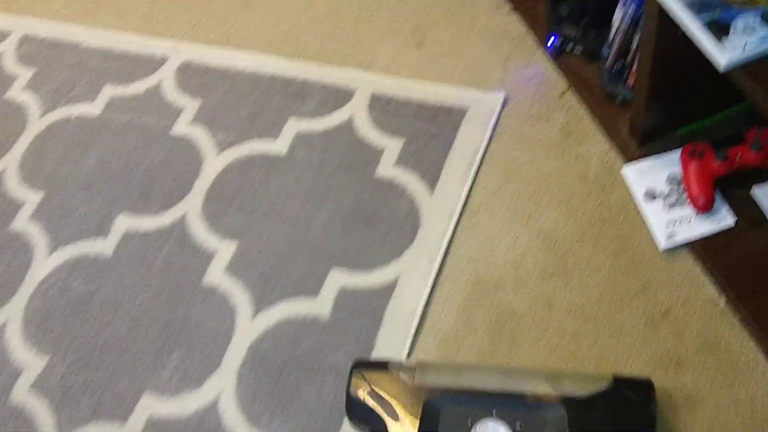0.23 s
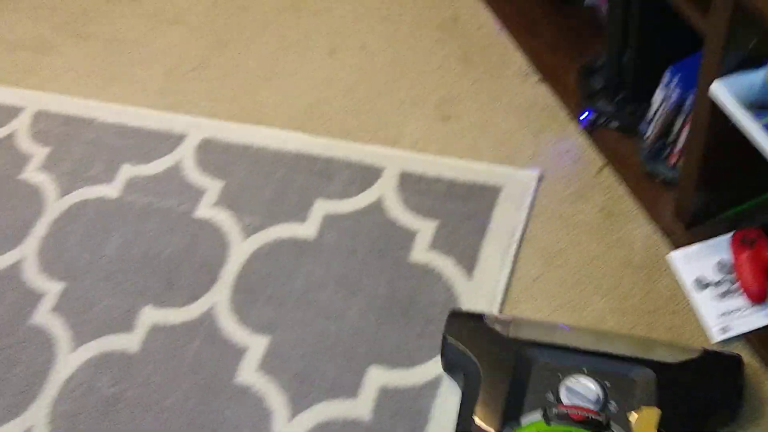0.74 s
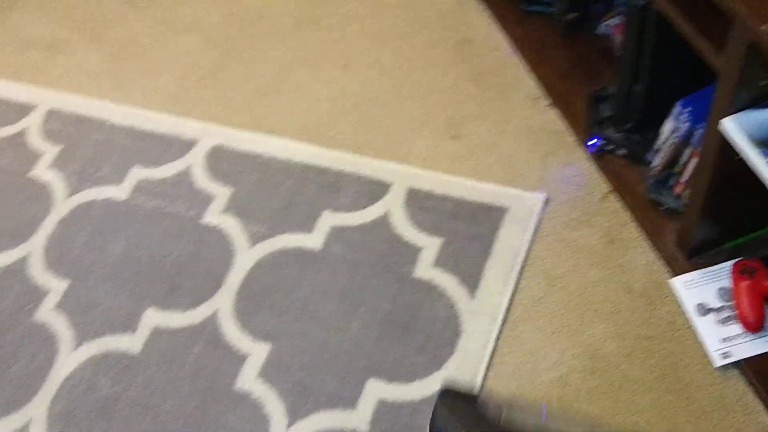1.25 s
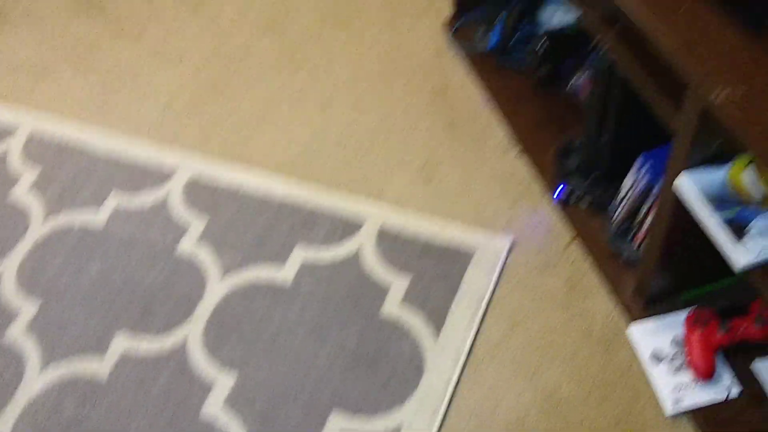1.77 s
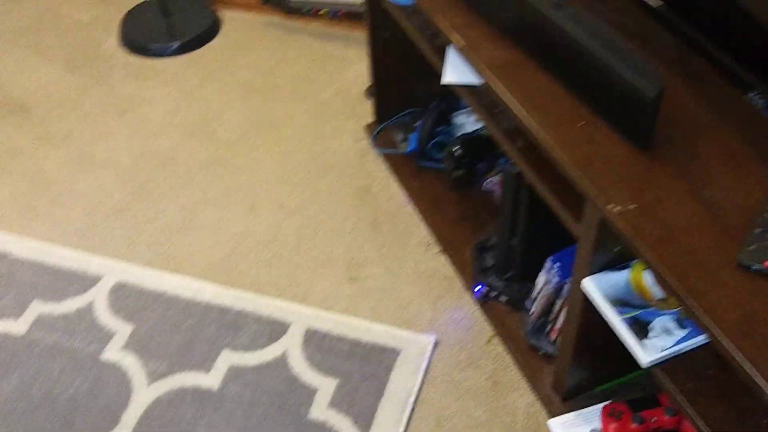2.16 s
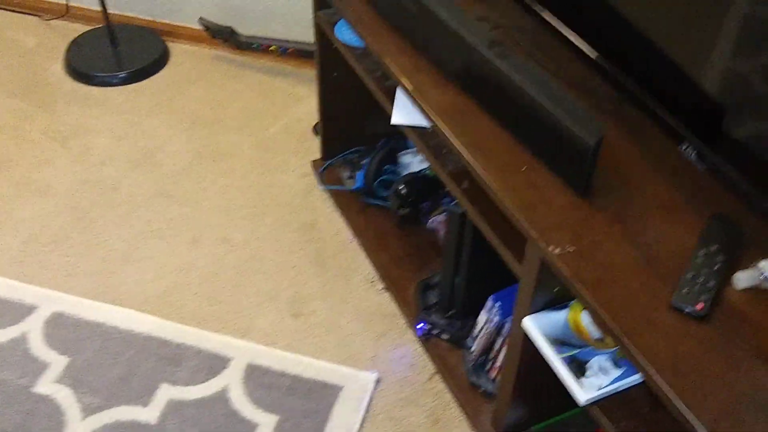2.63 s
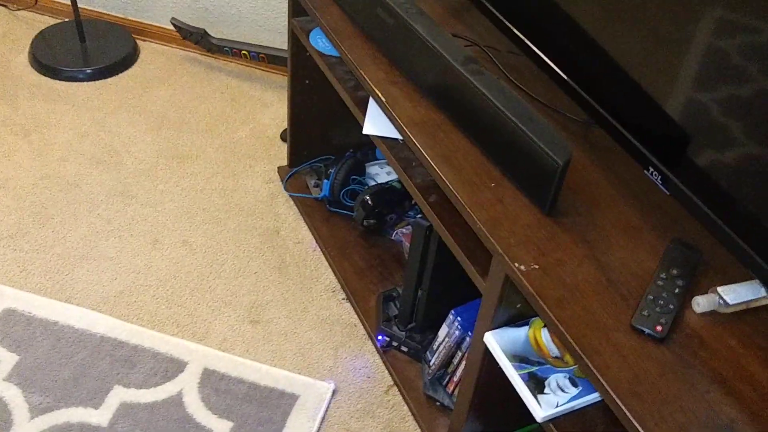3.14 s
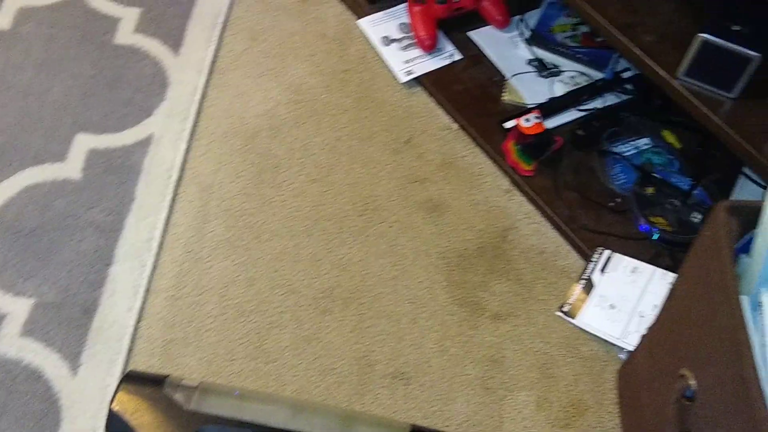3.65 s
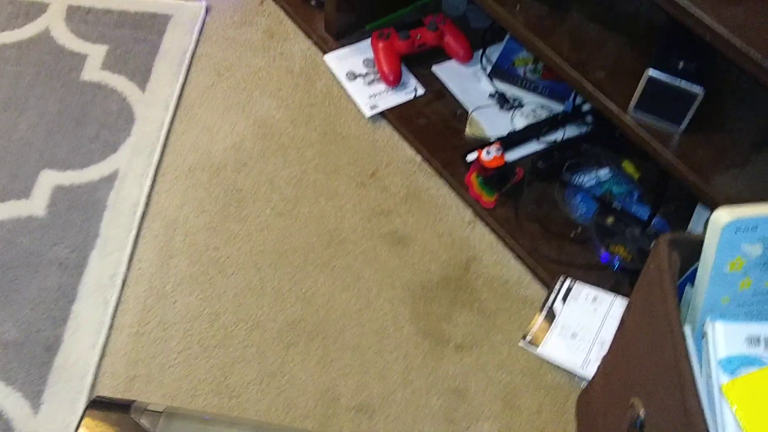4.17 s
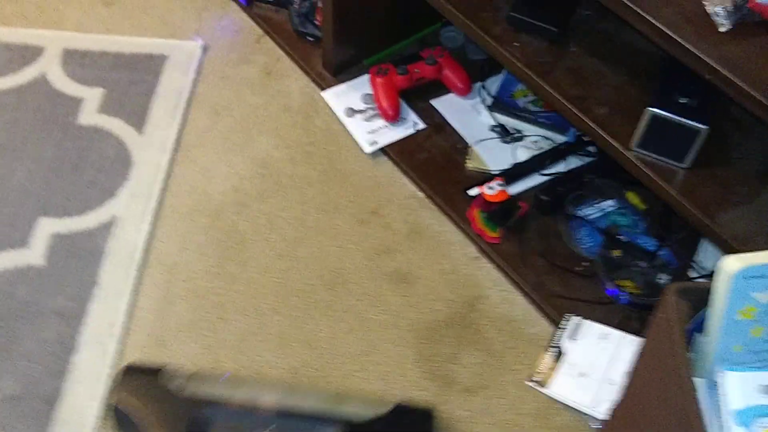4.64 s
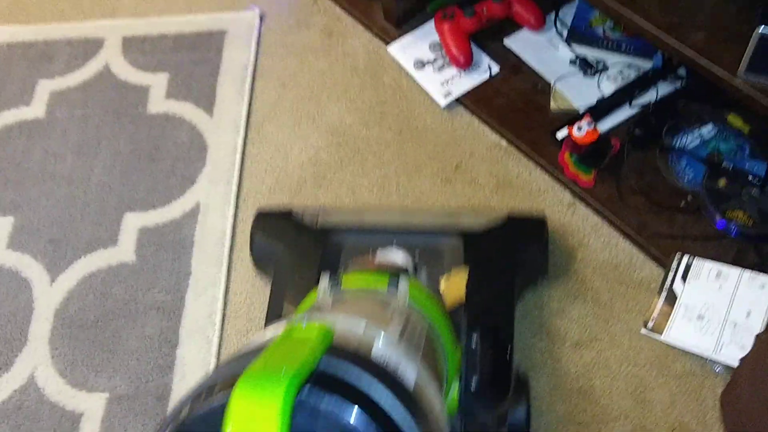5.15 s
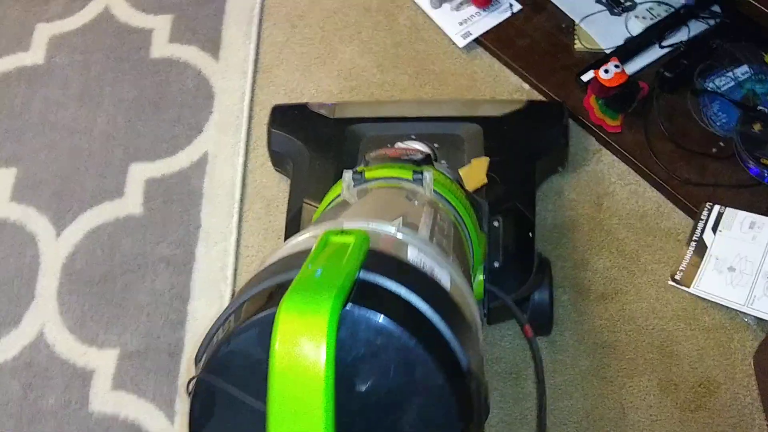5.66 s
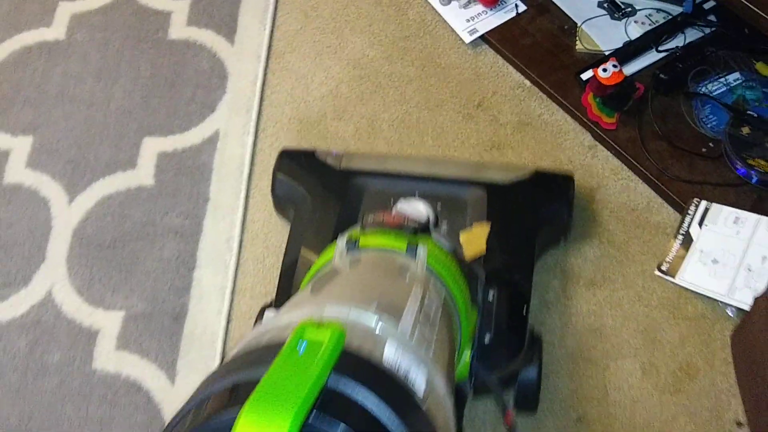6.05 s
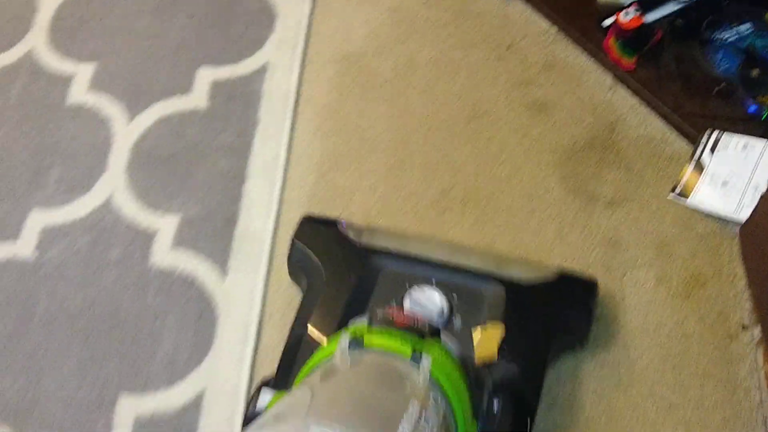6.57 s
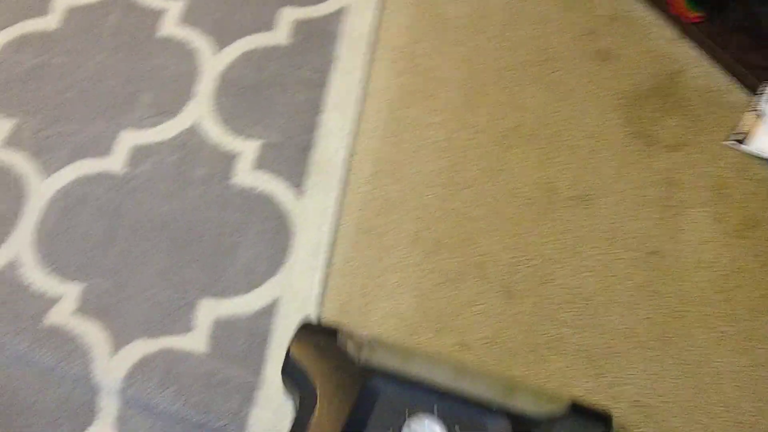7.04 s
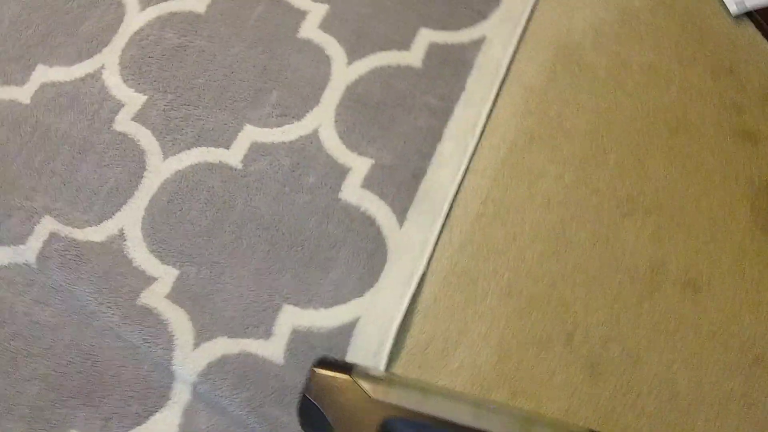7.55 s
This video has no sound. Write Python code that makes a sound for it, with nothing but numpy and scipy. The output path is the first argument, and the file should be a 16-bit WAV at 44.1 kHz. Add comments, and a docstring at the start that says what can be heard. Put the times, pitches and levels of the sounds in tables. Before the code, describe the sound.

A vacuum's motor coasts down over about two seconds, with shaky low hum, thinning air and tiny piercing wheel squeaks. Quiet follows, broken by a few sharp plastic clicks, brief rubbing and muffled knocks on carpet. Abruptly the machine is at full power, a dense roar with whine, brush whirr and bright hiss, scrubbing over pile with occasional squeaks. Close, dry indoor sound, slightly squashed when loud.

```python
"""In a small carpeted room an upright vacuum cleaner coasts down and fades while its wheels squeak.
In the lull its plastic parts click, soft scuffs rub and dull bumps land on the floor.
Then it is abruptly at full speed: fan whine, motor hum, brush roll and rushing air, pushed to and fro.
Rotors are fluttering sine lines, air and rubbing are shaped noise, squeaks are gliding sines,
and clicks and bumps are short bursts and fading tones."""
import sys
import numpy as np
from scipy import signal
from scipy.fft import rfft, irfft
from scipy.io import wavfile
from scipy.ndimage import uniform_filter1d

SR = 44100
rng = np.random.default_rng(int(sys.argv[2]) if len(sys.argv) > 2 else 0)


def file_out(sig):
    """Save sig as 16-bit WAV at sys.argv[1]."""
    # one column per channel
    cols = np.atleast_2d(sig).T
    # limit, then scale
    lim = np.clip(cols, -1, 1)
    pcm = np.round(lim * 32767).astype(np.int16)
    wavfile.write(sys.argv[1], SR, pcm)


N = 343980
T = np.arange(N) / SR  # time of every sample, s
HZ = np.fft.rfftfreq(N, 1 / SR)  # frequency of every spectrum bin


def gain_of(db):
    """Turns decibels into an amplitude factor."""
    return 10 ** (np.asarray(db) / 20)


def evened(x):
    """Scales a sound to an average strength (rms) of 1."""
    return x / np.sqrt(np.mean(x ** 2) + 1e-20)


def read(points, hz):
    """Reads a curve at the given frequencies, spaced by ratio as the ear hears them."""
    f, value = np.transpose(points)
    return np.interp(np.log(hz + 1), np.log(f + 1), value)


def curves(rows):
    """Joins the points of each table column into a curve over time."""
    s, *columns = np.transpose(rows)
    return [np.interp(T, s, c) for c in columns]


def add(mix, s, sound):
    """Mixes a sound in, starting at time s."""
    part = mix[max(round(s * SR), 0):][:len(sound)]
    part += sound[:len(part)]


def drift(rate, t=T):
    """Wanders at random with an rms of about 1, making about rate swings a second."""
    knots = rng.standard_normal(4096)
    return 1.29 * np.interp(t * 2 * rate, np.arange(len(knots)), knots)


def band(hz, width):
    """Resonance: gain 1 at its centre, falling to half at the edges of its width."""
    return 1 / (1 + (2 * (HZ - hz) / width) ** 2)


# how alike the left and right sounds are: (frequency [Hz], likeness [1 = same, 0 = unrelated])
LEFT_RIGHT_LIKENESS = [(60, 0.93), (130, 1), (290, 0.81), (640, 0.56), (1410, 0.5), (3100, .25),
                       (6800, -0.33), (15000, 0.62)]


def alike_pair(a, b, hz):
    """Blends two random signals into a left and a right one that are as alike as the table says."""
    same = np.clip(read(LEFT_RIGHT_LIKENESS, hz), -1, 1)
    return np.array([a, same * a + np.sqrt(1 - same ** 2) * b])


def noise_pair(shape):
    """Left and right noise spectra with a given shape, most alike in the bass."""
    a, b = rfft(rng.standard_normal((2, N)))
    return alike_pair(a, b, HZ) * shape


# balance of the two sides: (frequency [Hz], left minus right [dB])
LEFT_RIGHT_BALANCE = [(60, 3), (110, -1.5), (200, 0.5), (380, -1), (700, -0.5), (1290, -1.5), (2380, -5),
                      (4400, -2.5), (8120, -9.5), (15000, -15.5)]


def sides(hz):
    """Left and right gains: the treble is much stronger on the right."""
    tilt = gain_of(read(LEFT_RIGHT_BALANCE, hz))
    return np.array([tilt, np.ones_like(tilt)]) * np.sqrt(2 / (1 + tilt ** 2))


def placed(pair):
    """Gives a sound the left-right balance of the machine's position."""
    return irfft(rfft(pair) * sides(HZ), N)


# how long echoes last: (frequency [Hz], time to fall by 60 dB [s])
ROOM_DECAY = [(100, 0.53), (500, 0.24), (2000, 0.26), (9000, 0.22), (16000, 0.064)]


def room(x):
    """The room's dense echoes have random sign, and each band dies away at its own speed."""
    size = SR // 2
    reflections = rng.standard_normal((2, size)) * (rng.random((2, size)) < .12)
    reflections = reflections * (np.arange(size) > .004 * SR)  # the first echo comes after 4 ms
    hz, t, z = signal.stft(reflections, SR, nperseg=256)
    decay = gain_of(-60 * t / read(ROOM_DECAY, hz)[:, None])
    tail = signal.istft(z * decay, SR, nperseg=256)[1]
    tail = tail / np.linalg.norm(tail[0])
    return signal.fftconvolve(np.atleast_2d(x), tail, axes=1)[:, :N]


def partial(turns, hz, level, flutter):
    """One rotor tone flutters with turbulence and shifting reflections, less alike by side in the treble."""
    t = T[::100]  # the flutter is slow, so a coarse time grid is enough
    a, b = (drift(11, t) + 1j * drift(11, t) for _ in range(2))
    sway = (1 + flutter * alike_pair(a, b, hz)) / np.sqrt(1 + 2 * flutter ** 2)
    sway = np.array([np.interp(T, t, side) for side in sway])
    spin = np.exp(2j * np.pi * (turns + rng.random()))
    return np.sqrt(2) * level * (sway * spin).real


FAN_BLADES = 9
THIRD_DB = -12  # third multiple of the blade rate against the second, at top speed


def motor(hz, hum_db, whine_db, overtone_db, orders):
    """The shaft hums once a turn and the fan whines at its blade rate, over weaker (order, dB) lines."""
    turns = np.cumsum(hz * (1 + .0004 * drift(25))) / SR
    top_hz = hz.max()
    third_db = overtone_db + THIRD_DB - 90 * (1 - hz / top_hz)
    out = partial(turns, top_hz, gain_of(hum_db), flutter=0.059)
    for k, db in enumerate([whine_db, overtone_db, third_db], 1):
        out += partial(k * FAN_BLADES * turns, k * FAN_BLADES * top_hz, gain_of(db), flutter=0.55)
    for k, db in orders:
        out += partial(round(k) * turns, k * top_hz, gain_of(db), flutter=0.53)
    return out


def brush(hz, orders_db):
    """Two rows of bristles beat the carpet: firm low orders and a more fluttering buzz above them."""
    turns = np.cumsum(hz * (1 + .0012 * drift(14))) / SR
    return sum(partial(k * turns, k * hz.max(), gain_of(db), flutter=.16 + 0.044 * k)
               for k, db in enumerate(orders_db, 1))


# duct resonances: (frequency [Hz], width [Hz], boost [dB re 1 dB: 0 lifts the spectrum by 1 dB])
DUCT_RESONANCES = [(807, 74, 1), (1368, 87, 3.5), (2320, 110, -6)]


def air(colour, roar_db, hiss_db):
    """Turbulent air coloured by the ducts: a roar from the nozzle and a hiss from the exhaust."""
    ducts_db = sum(gain_of(db) * band(hz, width) for hz, width, db in DUCT_RESONANCES)
    stream = noise_pair(gain_of(read(colour, HZ) + ducts_db))
    low = 1 / (1 + (HZ / 4500) ** 4)  # the roar lies below about 4500 Hz, the hiss above
    roar = evened(irfft(stream * low, N)) * gain_of(roar_db + .5 * drift(25))
    hiss = evened(irfft(stream * (1 - low), N)) * gain_of(hiss_db + .4 * drift(30))
    return roar + hiss


# brief swells of the whine: (middle [s], half length [s], boost [dB])
SWELLS = [(.97, 0.039, 4), (1.31, 0.038, 12), (3.578, 0.11, 8), (4.77, 0.071, 7), (5.35, 0.062, 7),
          (5.99, .06, 10), (6.4, 0.081, 8.5), (7.15, 0.25, 5), (7.546, 0.25, 1)]


def swells_db():
    """The whine swells now and then as the machine moves through the room."""
    return sum(db * np.exp(-((T - s) / half) ** 2) for s, half, db in SWELLS)


# weaker motor lines, also used at full power:
# (shaft order, level under load [dB], level running freely [dB], level as coasting begins [dB])
MOTOR_LINES = [(2, -39, -49.5, -64.5), (3, -44.5, -43, -48.5), (4, -70, -66, -64.5), (5, -49, -58, -65),
               (10, -74, -69.5, -63), (12, -48.5, -48.5, -75.5), (24, -54, -54, -64)]
# brush roll lines from the first order up, also used at full power (SHAKEN_LINES replaces some in coasting):
# (level under load [dB], level running freely [dB], level as coasting begins [dB])
BRUSH_LINES = [(-39, -42.5, -49.5), (-38, -29, -56), (-43, -45.5, -56.5), (-35.5, -36, -41),
               (-46, -45.5, -44.5), (-38, -37, -54), (-49.5, -53, -65), (-42, -42.5, -61),
               (-45, -48.5, -68.5), (-48.5, -44, -69), (-41.5, -52, -63), (-63, -52, -65.5),
               (-51, -47, -68.5)]
# low shaking of the body, a guide for the hum and two brush lines: (time [s], level [dB])
BODY_SHAKE = [(0.0, -32), (0.122, -37.5), (0.16, -25.5), (0.306, -36.5), (0.33, -27), (0.718, -38.5),
              (0.876, -64.5), (1.012, -75.5), (1.7, -70)]
# brush roll lines that the shaking brings out: {order: level against the shaking [dB]}
SHAKEN_LINES = {2: -17.5, 4: -4}
# colour of the coasting air stream: (frequency [Hz], relative level [dB per Hz])
COASTING_AIR = [(30, -30), (80, -11), (250, 5), (600, 1.5), (1100, -6), (2500, -7), (4000, -10),
                (6000, -9.5), (9000, -6.5), (12000, -7.5), (16000, -26)]
# shaft speed under power, moment power is cut, and time scales of fan drag and bearing friction
POWERED_HZ, POWER_OFF_S, DRAG_S, STOP_S = 469.5, .0806, 1.144, 6.8
# the belt slips under power and holds the brush roll back; coasting, it grips at a fixed ratio
BRUSH_POWERED_HZ, BELT_RATIO = 94.6, .211
# dB that each sound loses for every dB of lost speed
WHINE_FADE, OCTAVE_FADE, MOTOR_FADE, BRUSH_FADE, ROAR_FADE, HISS_FADE = 3.9, 17.0, 8.0, 3.6, 1.5, 2.45
# the falling whine sweeps through a resonance of the fan housing
HOUSING_HZ, HOUSING_WIDTH_HZ, HOUSING_DB = 2750, 606, 27.5


def coasting():
    """Power is cut: drag and friction slow the rotors, the body shakes, and the sounds fade with speed."""
    off = np.maximum(T - POWER_OFF_S, 0)  # seconds since power was cut
    speed = np.maximum((1 - off / STOP_S) / (1 + off / DRAG_S), .05)
    hz, speed_db = POWERED_HZ * speed, 20 * np.log10(speed)
    shake_db, = curves(BODY_SHAKE)
    from_housing = 2 * (FAN_BLADES * hz - HOUSING_HZ) / HOUSING_WIDTH_HZ
    housing = 1 + gain_of(HOUSING_DB) / (1 + from_housing ** 2)
    rotors = motor(
        hz,
        # the hum is held down while power is on and swells up just after it is cut
        hum_db=shake_db - 1.5 + .7 * speed_db - 13 * np.exp(-(off / .03) ** 2),
        whine_db=-48.5 + WHINE_FADE * speed_db + 20 * np.log10(housing) + swells_db(),
        overtone_db=-42.5 + OCTAVE_FADE * speed_db + 3 * drift(14),
        orders=[(k, db + MOTOR_FADE * speed_db) for k, _, _, db in MOTOR_LINES])
    bristles_db = [db + BRUSH_FADE * speed_db for _, _, db in BRUSH_LINES]
    for order, db in SHAKEN_LINES.items():
        bristles_db[order - 1] = shake_db + db
    rotors += brush(np.minimum(BRUSH_POWERED_HZ, BELT_RATIO * hz), bristles_db)
    # the small body radiates little deep bass
    rotors = signal.sosfilt(signal.butter(4, 85, "high", fs=SR, output="sos"), rotors)
    draught = air(COASTING_AIR, roar_db=-50.5 + ROAR_FADE * speed_db, hiss_db=-56 + HISS_FADE * speed_db)
    fade = gain_of(-28 * np.maximum(T - 1.6, 0))  # from 1.6 s on, another 28 dB softer each second
    return (rotors + gain_of(-7) * room(rotors) + draught) * fade


# wheel squeaks: (time [s], length [s], middle pitch [Hz], level before the mix [dB])
WHEEL_SQUEAKS = [ (0, .015, 9900, -19), (0.041, 0.042, 10320, -22.5), (0.105, 0.021, 9290, -23),
                 (0.159, 0.086, 9230, -18.5), (0.266, 0.019, 9300, -14.5), (.292, 0.011, 9340, -15.5),
                 (0.347, .025, 9850, -26), (0.351, .039, 9240, -14), (0.417, 0.025, 9250, -25),
                 (0.437, 0.035, 8650, -20), (0.521, .03, 8700, -18), (0.619, 0.045, 8200, -41.5),
                 (0.805, 0.036, 9300, -29.5), (0.837, 0.032, 8860, -31.5), (1.29, .054, 8360, -26.5),
                 (1.378, 0.033, 8150, -32.5), (1.412, .047, 8130, -20), (1.477, 0.028, 8120, -21),
                 (1.518, 0.014, 8270, -15.5), (1.536, 0.035, 8040, -21.5), (1.582, 0.038, 8270, -15),
                 (1.621, 0.032, 8280, -18.5), (1.664, 0.0097, 8590, -15.5), (1.678, .022, 8250, -23),
                 (1.787, 0.025, 10570, -27), (1.798, 0.017, 9240, -19.5), (4.359, 0.053, 9770, -26),
                 (4.848, .037, 9920, -19.5), (4.918, 0.044, 10900, -18.5), (5.168, 0.075, 10210, -18),
                 (5.316, .022, 10250, -21), (5.425, .078, 10490, -26), (5.801, 0.027, 9080, -24.5),
                 (6.201, 0.016, 8900, -16), (6.37, .028, 10100, -23.5), (6.538, 0.017, 8950, -15),
                 (6.749, 0.056, 8410, -22), (6.804, .025, 8900, -19.5), (6.868, 0.019, 9390, -12),
                 (7.018, 0.016, 8230, -19.5), (7.058, 0.052, 8690, -19), (7.112, 0.027, 8250, -24.5)]
# largest glide either way as a share of the pitch; the wheel's own ring and its level against the whistle
SQUEAK_GLIDE, WHEEL_MODE_HZ, WHEEL_MODE_DB = .022, 9350, -21


def squeaks():
    """A dry wheel sticks and slips: short, unsteady, gliding whistles over a faint ring of the wheel."""
    out = np.zeros(N)
    for s, length, pitch_hz, db in WHEEL_SQUEAKS:
        t = np.arange(round(length * SR)) / SR
        glide = SQUEAK_GLIDE * rng.uniform(-1, 1) * np.linspace(-1, 1, len(t))
        angle = 2 * np.pi * np.cumsum(pitch_hz * (1 + glide + .007 * drift(170, t))) / SR
        grip = signal.windows.tukey(len(t), .5) * gain_of(1.8 * drift(140, t))
        # the ring wavers along with the whistle
        ring = gain_of(WHEEL_MODE_DB) * np.sin(angle * WHEEL_MODE_HZ / pitch_hz)
        add(out, s, gain_of(db) * evened(grip * (np.sin(angle) + ring)))
    return out


# colour of the still room: (frequency [Hz], relative level [dB per Hz])
STILL_COLOUR = [(30, -1.5), (100, 0), (390, -2), (700, -9), (1070, -4), (1700, -17), (4000, -15),
                (12000, -15.5), (16000, -24)]


def still_room():
    """The still room is a very faint, steady noise underneath everything."""
    return gain_of(-79.5) * evened(irfft(noise_pair(gain_of(read(STILL_COLOUR, HZ))), N))


# soft scuffs: (time [s], length [s], level before the mix [dB], low resonance [Hz], its width [Hz],
# high resonance [Hz], its width [Hz], high against low [dB])
SOFT_SCUFFS = [(1.677, 0.098, -61.5, 328.5, 400, 716, 300, -4),
               (2.066, 0.16, -50, 380, 700, 2090, 1000, 13.5),
               (2.494, 0.12, -49.5, 270, 330, 2080, 1950, 3), (2.923, 0.14, -46, 480, 800, 1050, 801, -7.5)]


def scuffs():
    """Brief rubbing on carpet and plastic: grainy friction in two broad resonances."""
    out = np.zeros(N)
    for s, length, db, low_hz, low_width, high_hz, high_width, high_db in SOFT_SCUFFS:
        rub = rfft(rng.standard_normal(N))
        t = np.arange(round(length * SR)) / SR
        low = evened(irfft(rub * band(low_hz, low_width) ** 2, N)[:len(t)])
        high = evened(irfft(rub * band(high_hz, high_width) ** 2, N)[:len(t)])
        stroke = np.minimum(t / 0.0212, 1) * np.cos(np.pi / 2 * t / length)
        stroke = stroke * gain_of(2.2 * drift(70, t))  # grain
        add(out, s, gain_of(db) * evened(stroke * (low + gain_of(high_db) * high)))
    return out


# plastic clicks: (time [s], level before the mix [dB], lowest frequency [Hz], rattle's time to fall 60 dB [s],
# first crack against the rattle [dB], ring of the shell [dB])
PLASTIC_CLICKS = [(2.001, -35.5, 11070, 0.021, -27, -58), (2.057, -31.5, 1470, 0.28, -23, -10),
                  (2.138, -28, 3050, 0.031, 2, -28), (2.207, -53, 4010, 0.017, -11, -36),
                  (2.659, -38.5, 2500, 0.026, -14, -34), (2.674, -18.5, 2930, 0.031, 3, -42.5),
                  (3.329, -32, 8200, 0.0086, -4, -62), (3.346, -45, 8000, 0.011, -7, -62.5),
                  (3.354, -38.5, 8120, .012, -6, -62)]
# ringing tones of the plastic shell: (frequency [Hz], relative level [dB], time to fall by 60 dB [s])
SHELL_MODES = [(408, -9.5, 0.067), (650, -8, 0.076), (830, -2.5, 0.048), (1086, 1.5, .07),
               (1450, 4.5, 0.09), (1765, 5, 0.09), (2136, -7, 0.11), (3350, 6, 0.043)]


def clicks():
    """A sharp crack and a short rattle of plastic; each click also rings the shell by its own amount."""
    out, t = np.zeros(N), np.arange(SR // 3) / SR
    soften = signal.butter(2, 12500, "low", fs=SR, output="sos")
    bright = signal.butter(1, [9000, 12500], "band", fs=SR, output="sos")
    for s, db, low_hz, t60, crack_db, ring_db in PLASTIC_CLICKS:
        high_pass = signal.butter(4, low_hz, "high", fs=SR, output="sos")
        force = gain_of(-60 * t / t60) + gain_of(crack_db) * np.exp(-t / 0.00034)
        snap = signal.sosfilt(np.vstack([high_pass, soften]), rng.standard_normal(len(t)) * force)
        snap += signal.sosfilt(bright, snap)
        ring = sum(gain_of(mode_db - 60 * t / life) * np.sin(2 * np.pi * hz * t + rng.uniform(0, 2 * np.pi))
                   for hz, mode_db, life in SHELL_MODES)
        add(out, s, gain_of(db) * (gain_of(-2.5) * snap + gain_of(ring_db) * ring))
    return out


# dull bumps: (time [s], pitch before sagging [Hz], level before the mix [dB], time to fall by 60 dB [s])
FLOOR_BUMPS = [(2.057, 391, -33.5, 0.081), (2.5, 572, -46.5, 0.15), (2.512, 326, -48.5, 0.11),
               (2.546, 241, -34, 0.069), (2.93, 484, -48, 0.11)]


def thuds():
    """Dull bumps on the carpeted floor: one fading tone each, sagging in pitch as the push lets go."""
    out, t = np.zeros(N), np.arange(SR // 3) / SR
    sag = 0.8 + 0.195 * np.exp(-t / 0.035)
    for s, hz, db, t60 in FLOOR_BUMPS:
        turns = np.cumsum(hz * sag) / SR
        strength = gain_of(db - 60 * t / t60) * np.minimum(t / 0.0028, 1)
        add(out, s, strength * np.sin(2 * np.pi * turns))
    return out


# carpet pile rushing past the nozzle: (time [s], guide level [dB])
PILE_RUSH = [(3.6, -51), (4.6, -55), (5, -40), (5.6, -31.5), (6.2, -33.5), (6.8, -41.5), (7.3, -34.5),
             (7.8, -38)]


def scrub():
    """Bristles and wheels rush through the pile as the machine is pushed."""
    level_db, = curves(PILE_RUSH)
    shape = band(620, 1000) ** 2 * HZ ** 2 / (HZ ** 2 + 200 ** 2)
    return evened(irfft(noise_pair(shape), N)) * gain_of(level_db + drift(18))


# running speed, mostly rising as the pile lets go of the brush roll: (time [s], shaft speed [turns per s])
RUNNING_SPEED = [(3.6, 464), (4.8, 464.4), (5.35, 468.5), (5.75, 468.1), (6.05, 472.7), (6.4, 472.4),
                 (7.15, 472.3), (7.45, 477), (7.6, 477.4), (7.8, 472.4)]
# shaft hum as the machine moves about the room: (time [s], level before a 0.3 dB cut [dB])
HUM_LEVEL = [(3.6, -28.5), (3.96, -30.5), (4.62, -26), (5.07, -41.5), (5.63, -27.5), (6.15, -35.5),
             (6.76, -24.5), (7.46, -29.5), (7.6, -26), (7.8, -26.5)]
# colour of the air stream at full power: (frequency [Hz], relative level [dB per Hz])
RUNNING_AIR = [(25, -23.5), (70, -19), (120, -2.5), (220, -7), (380, 3), (650, -1), (1000, 0.5),
               (1900, -4.5), (3000, -5), (5000, -9.5), (7000, -9.5), (9500, -6), (11200, -4.5),
               (13000, -16), (16000, -22.5)]
# shaft speed with the brush dug into the pile and running freely; the same for the brush roll;
# the motor's delay behind the brush roll
LOADED_HZ, FREE_HZ = 464.7, 472.13
BRUSH_LOADED_HZ, BRUSH_FREE_HZ, MOTOR_LAG_S = 94.1, 99.1, .06
# the whine's octave stands out while the body is in front of the listener: from, until, fade, and how much
FACING_S, AWAY_S, TURN_S, FACING_DB = 5.75, 7.3, .2, 8


def running():
    """Full power: the drag of the pile sets both speeds and the balance of the lines."""
    hz, = curves(RUNNING_SPEED)
    hum_db, = curves(HUM_LEVEL)
    # 0 = dug in, 1 = running freely; read ahead, since the motor follows the brush roll
    free = np.interp(T + MOTOR_LAG_S, T, (hz - LOADED_HZ) / (FREE_HZ - LOADED_HZ))
    slapping = np.clip((free - .52) / 0.47, 0, 1.5)  # the bristles slap harder as the roll frees itself
    facing = np.clip(np.minimum(T - FACING_S, AWAY_S - T) / TURN_S, 0, 1)
    whirr = motor(
        hz,
        hum_db=hum_db - .3,
        whine_db=-45.5 + 2.8 * free + 0.63 * drift(5) + swells_db(),
        overtone_db=-44.0 + FACING_DB * facing,
        orders=[(k, loaded_db + (free_db - loaded_db) * free) for k, loaded_db, free_db, _ in MOTOR_LINES])
    roll = brush(
        BRUSH_LOADED_HZ + (BRUSH_FREE_HZ - BRUSH_LOADED_HZ) * free,
        [loaded_db + (free_db - loaded_db) * slapping for loaded_db, free_db, _ in BRUSH_LINES])
    return whirr + roll + scrub() + air(RUNNING_AIR, roar_db=-31.0, hiss_db=-29.5)


FULL_SPEED_S = 3.5775  # from here the machine is heard at full speed


def scene():
    """Coasting with squeaks, a lull with clicks, scuffs and bumps, then abruptly full speed."""
    at_full_speed = np.clip((T - FULL_SPEED_S) / 0.0016, 0, 1)
    machine = placed(coasting() * (1 - at_full_speed) + running() * at_full_speed)
    wheel = gain_of(0.5) * squeaks()
    wheels = wheel * gain_of([[-15], [0]]) + room(wheel) * gain_of([[-16], [-12]])  # [left], [right]
    click = clicks()
    bump = signal.sosfilt(signal.butter(2, 90, "high", fs=SR, output="sos"), scuffs() + thuds())
    handling = placed(click + gain_of(-7.5) * room(click) + bump + gain_of(-8.0) * room(bump))
    return machine + wheels + handling + still_room()


def record(dry):
    """Turns the upper band down whenever it gets loud, then removes the highest treble."""
    upper = irfft(rfft(dry) * (1 - 1 / (1 + (HZ / 1200) ** 4)), N)
    power = uniform_filter1d((upper ** 2).mean(0), size=200)
    power_db = 10 * np.log10(abs(power) + 1e-12)
    over_db = uniform_filter1d(np.maximum(power_db + 26.5, 0), size=200)  # excess above -26.5 dB
    ducked = dry - upper + upper / gain_of(0.29 * over_db)
    treble_cut = signal.firwin(511, 16100, window=("kaiser", 9), fs=SR)
    return signal.oaconvolve(ducked, treble_cut[None], "same")


dry = scene()
out = record(dry)
file_out(out)
```